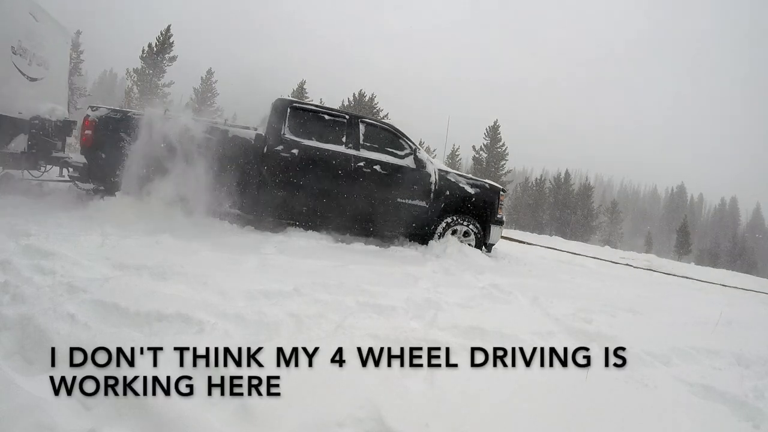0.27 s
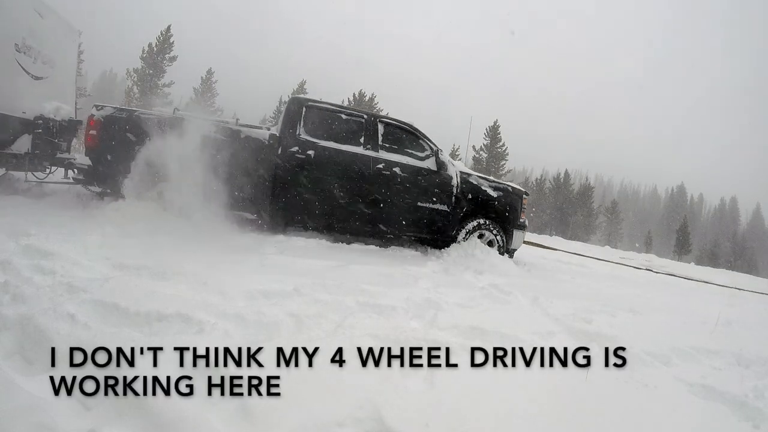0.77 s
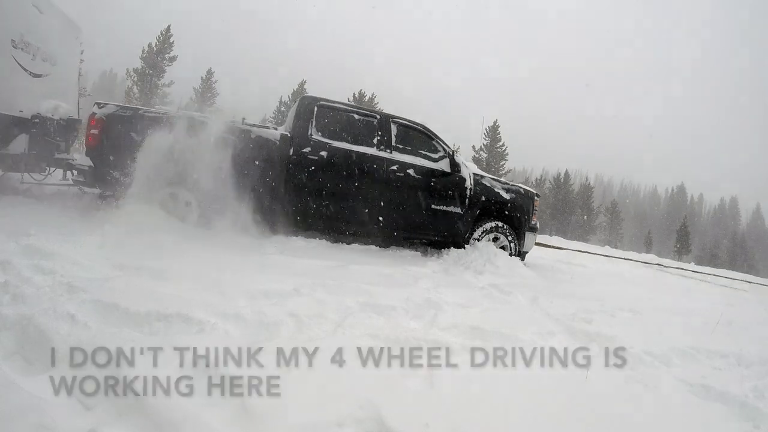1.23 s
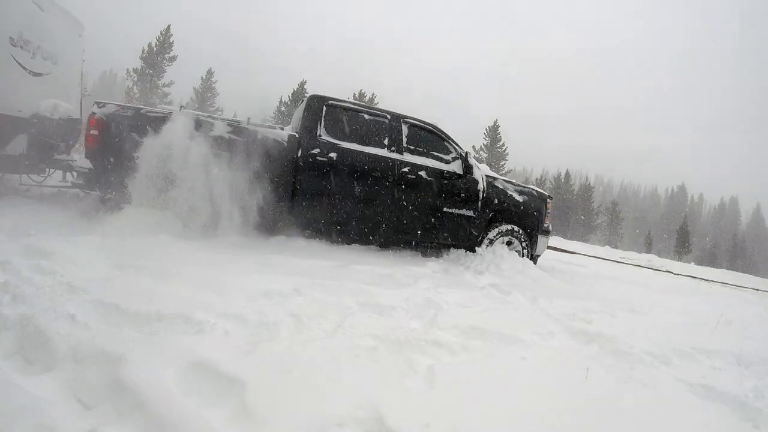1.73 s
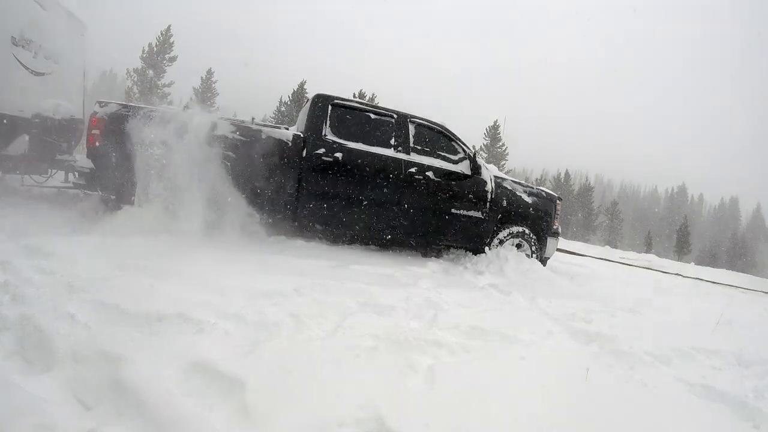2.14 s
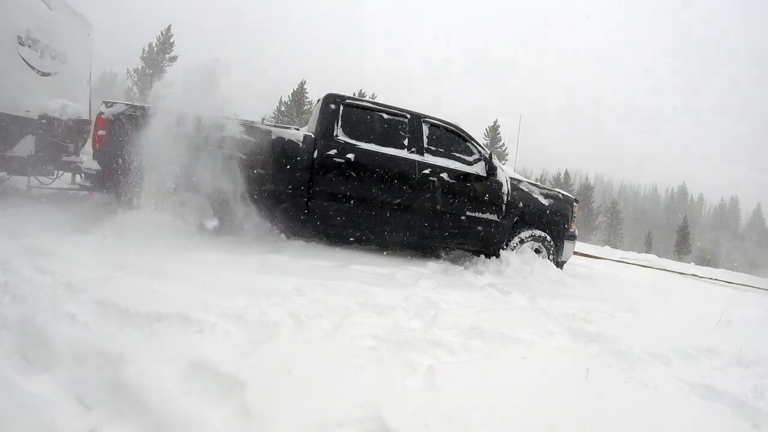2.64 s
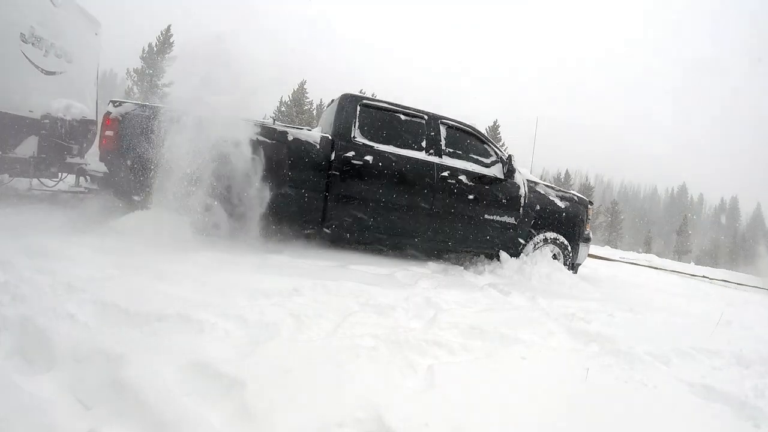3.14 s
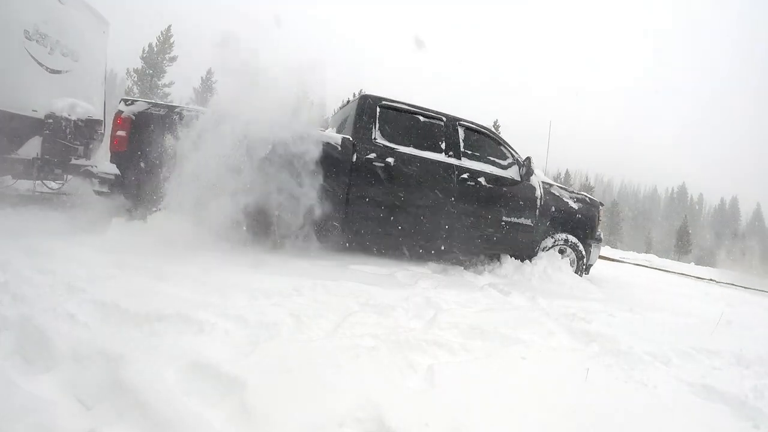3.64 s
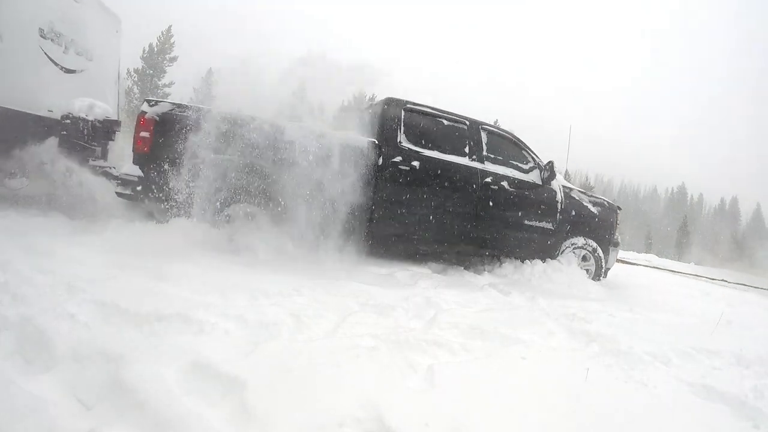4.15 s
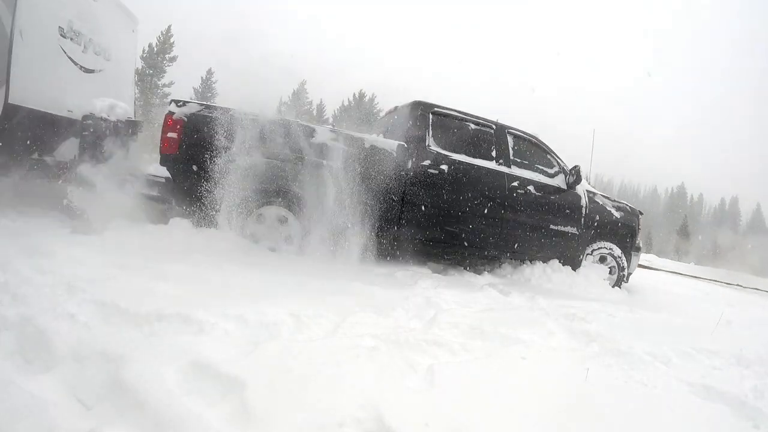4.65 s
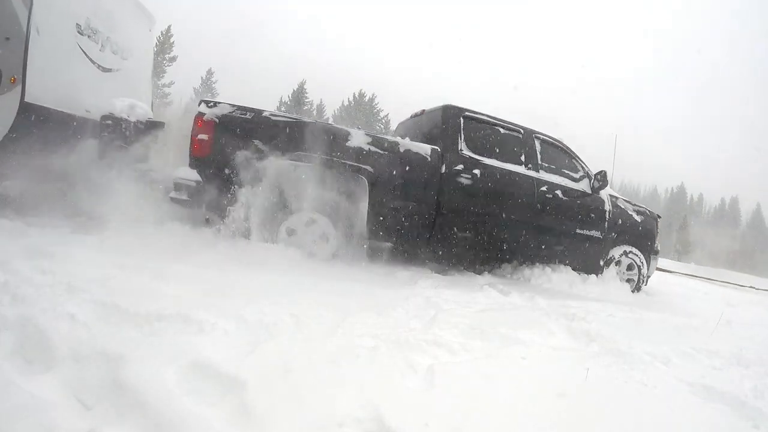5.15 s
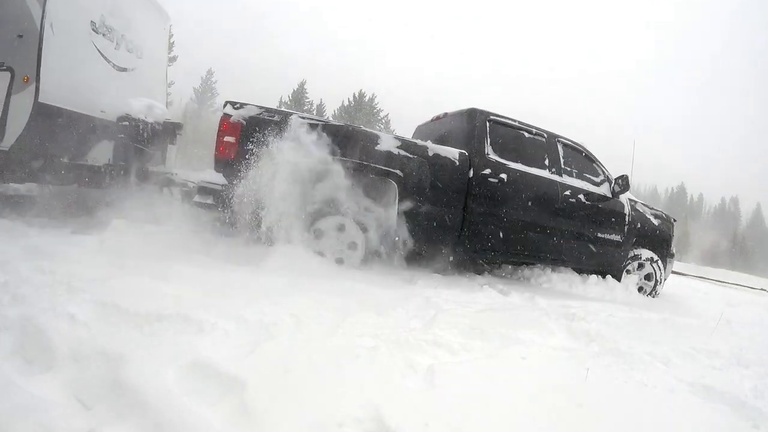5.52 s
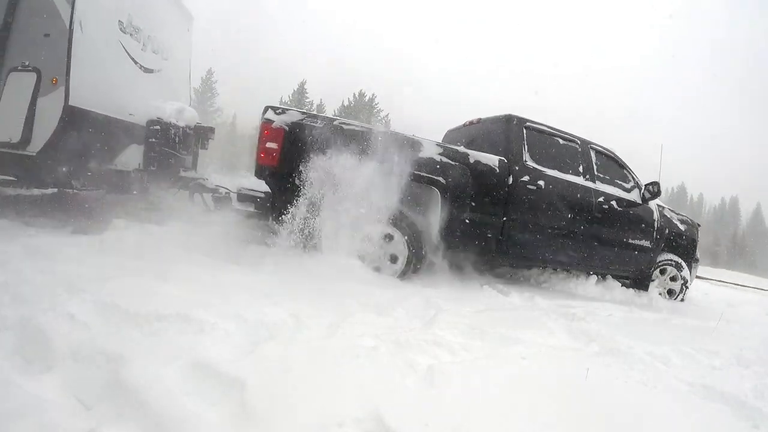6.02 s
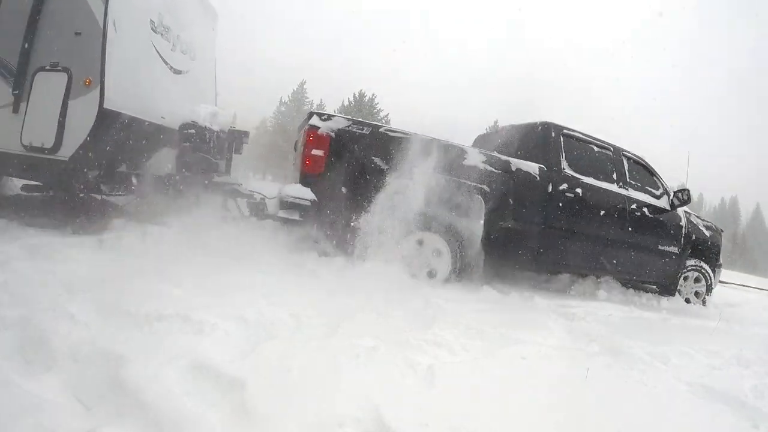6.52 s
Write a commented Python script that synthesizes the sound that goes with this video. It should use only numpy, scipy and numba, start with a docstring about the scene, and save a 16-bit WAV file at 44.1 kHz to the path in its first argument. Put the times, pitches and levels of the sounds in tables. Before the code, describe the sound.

Close outdoor phone pickup of a truck with spinning wheels in snow: a short loud rev sags, a longer one builds and holds, then the throttle lifts and the engine pulls on more quietly, slowly sinking. A deep wavering exhaust hum glides beneath. Snow spray hisses brightly during the revs and thins afterwards. Snowy ground reflects the sound slightly late, giving a hollow, combed colour without any roomy echo.

```python
"""Pickup engine in deep snow: revs hard, wheels spinning, lifts off, labours on more quietly.
Sines on multiples of the cycle rate make the engine tone; one order carries a whine.
A deep exhaust drone glides on its own pitch, with brief low hums beside it.
Shaped noise makes gas roar, churned and thrown snow, and the bass of body and wind.
The snow surface returns engine tone, gas and thrown snow a little late, which combs them."""
import sys
import numpy as np
from scipy import signal
from scipy.fft import rfft, irfft
from scipy.io import wavfile
from scipy.ndimage import uniform_filter1d, map_coordinates
from numba import njit

SR = 44100
rng = np.random.default_rng(int(sys.argv[2]) if len(sys.argv) > 2 else 0)


def decibels_to_gain(level_db):
    """Convert a level in decibels to a linear amplitude gain (20 dB per decade)."""
    exponent = np.asarray(level_db, float) / 20
    return 10 ** exponent


def waveform_to_disk(signal):
    """Save audio, clipped to [-1, 1], as 16-bit WAV at the path in sys.argv[1]."""
    frames = np.transpose(np.atleast_2d(signal))
    scaled = np.clip(frames, -1, 1) * 32767
    samples = np.round(scaled).astype(np.int16)
    wavfile.write(sys.argv[1], SR, samples)


N = 298557
T = np.arange(N) / SR  # s

# engine, a short rev, a long rev, then the quieter pull: t/s, cycle rate f/Hz, effort level/dB
ENGINE_CURVE = [(0.0, 39, 0), (0.146, 40.02, 1), (0.3, 40.95, 1), (0.55, 40.22, -1.5), (0.684, 38.71, -0.5),
                (0.802, 37.21, -1), (0.978, 32.43, -4.5), (1.158, 29.34, -4.5), (1.33, 28, -5),
                (1.62, 30.29, -2), (1.87, 32.22, -1), (2.17, 33.32, -1), (2.73, 34.44, -0.5),
                (3.01, 36.36, 0.5), (3.34, 37.4, 0), (3.75, 37.69, -0.5), (3.9, 37.17, -0.5),
                (4.13, 35.36, -2), (4.4, 31.48, -6), (4.55, 31.24, -10), (5.1, 30.02, -8.5),
                (5.55, 28.56, -7), (6.0, 27.87, -8), (6.5, 26.4, -10.5), (6.77, 26.4, -9)]
# outline of the engine orders at 0 dB effort: f/Hz, level/dB
ORDER_OUTLINE = [(30, -24.5), (100, -24.5), (160, -35), (300, -42.5), (480, -45.5), (750, -50.5),
                 (1000, -50.5), (1300, -41.5), (1700, -44.5), (2100, -56)]
# orders that stand out of the outline: multiple of the cycle rate, lift level/dB
STRONG_ORDERS = [(2, 2), (3, 5.5), (4, 1.5), (8, 6), (9, 3.5), (12, 7), (14, 3), (16, 6), (18, 12), (21, 0),
                 (29, 11.5), (32, 8.5), (36, 9), (38, 3.5), (40, 3), (43, 5), (46, 7.5)]
# exhaust and body resonances: centre f/Hz, width f/Hz, lift level/dB
PIPE_RESONANCES = [(78.2, 10, 4), (161, 24, 4), (302, 27, 6), (464, 49, 7.5), (650, 85, 7.5),
                   (1310, 180, 2.5), (1590, 20, 2)]
# whine on one engine order: t/s, level/dB
WHINE_CURVE = [(0, -28), (0.3, -25), (0.8, -32), (1.2, -31), (1.7, -33.5), (2.1, -33), (3.0, -36),
               (3.6, -33), (4.3, -38.5), (5.2, -40), (5.45, -31), (6.77, -31.5)]
# deep exhaust drone: t/s, pitch f/Hz, level/dB
DRONE_CURVE = [(0.0, 75.6, -7.5), (0.21, 78.6, -18.5), (0.4, 79.27, -9.5), (0.68, 80.1, -17),
               (0.81, 94.7, -16), (1.17, 111.8, -11.5), (1.6, 133.1, -23), (1.79, 129.3, -30),
               (2.06, 130.5, -18.5), (2.56, 129.8, -18), (2.88, 122.9, -15), (3.13, 113.7, -10),
               (3.71, 105.9, -18.5), (4.24, 101.3, -13.5), (4.4, 100.7, -24), (4.72, 98.5, -18),
               (4.92, 103.7, -11), (5.3, 111.1, -12), (6.32, 112.7, -14.5), (6.77, 120.4, -15)]
# partials of the drone: multiple of its pitch, level/dB
DRONE_PARTIALS = [(0.501, -21.5), (0.749, -18), (1, 0.5), (1.499, -26.5), (2, -28.5)]
# low hums: middle t/s, length t/s, start f/Hz, end f/Hz, level/dB
HUM_EVENTS = [(1.08, .4, 150.7, 144, -19), (1.999, 0.66, 189.5, 202.8, -27),
              (3.897, .5, 218.4, 207.1, -25.5), (4.95, 0.91, 171.5, 163, -22)]
# gas roar spectrum: f/Hz, relative level/dB per Hz
GAS_SPECTRUM = [(200, -6), (400, -12), (700, 5), (1300, 1), (2000, -2.5), (3000, -9), (5000, -34),
                (9000, -63)]
# low churning spectrum: f/Hz, relative level/dB per Hz
RUMBLE_SPECTRUM = [(100, -9.5), (170, -1), (230, -1.5), (300, 1), (400, -7.5), (550, -13), (900, -18),
                   (2000, -63)]
# low churning: t/s, level/dB
RUMBLE_CURVE = [(0, -20.5), (0.4, -30.5), (0.9, -31), (1.04, -20), (1.39, -30), (1.6, -26), (2.9, -23.5),
                (4.0, -19.5), (4.45, -18.5), (4.6, -23.5), (5.2, -22), (5.4, -25.5), (6.1, -24),
                (6.77, -26.5)]
# thrown snow spectrum: f/Hz, relative level/dB per Hz
SPRAY_SPECTRUM = [(1500, -14.5), (3000, -2), (4200, -2), (5600, -0.5), (6300, -25), (8200, -32),
                  (11600, -41)]
# thrown snow: t/s, level/dB
SPRAY_CURVE = [(0, -30), (0.24, -25), (0.41, -28), (0.8, -28.5), (0.95, -29), (1.39, -30), (1.64, -27.5),
               (2.2, -26.5), (2.8, -26.5), (3.3, -27), (3.9, -26.5), (4.24, -24), (4.53, -36.5),
               (4.95, -33.5), (5.4, -33), (6.15, -32.5), (6.6, -35.5), (6.77, -41.5)]
# finest powder spectrum: f/Hz, relative level/dB per Hz
POWDER_SPECTRUM = [(5500, -11), (6800, -1), (8300, -1), (10000, -6.5), (11600, -26), (15000, -28.5)]
# snow surge spectrum: f/Hz, relative level/dB per Hz
SURGE_SPECTRUM = [(2500, -24), (3600, -9), (4000, -1.5), (4700, 1), (5300, -9), (7000, -38)]
# bright surges of thrown snow: middle t/s, length t/s, level/dB
SURGE_EVENTS = [(0.2, 0.41, -30), (1.7, .5, -35), (2.8, .9, -29.5), (4.197, 0.41, -39.5)]
# reflection off the snow: t/s, first notch f/Hz, returned share 0-1
SNOW_BOUNCE = [(0, 1014, 0.24), (2.5, 1018, 0.46), (3.5, 995, 0.47), (4.2, 928.7, 0.51), (4.8, 862, 0.39),
               (5.6, 852, 0.49), (6.77, 842, 0.72)]
# bass spectrum: f/Hz, relative level/dB per Hz
BASS_SPECTRUM = [(10, -22), (20, -10), (33, 2), (50, -2.5), (80, -0.5), (120, -3), (160, -12), (250, -40),
                 (600, -63)]
# bass: t/s, level/dB
BASS_CURVE = [(0, -21.5), (1, -15), (2, -18.5), (4.5, -17), (5, -17.5), (6.4, -20.5), (6.77, -14)]

# dB gained per dB of effort
LOW_FOLLOW, MID_FOLLOW, HIGH_FOLLOW, GAS_FOLLOW = 0.24, 1.2, 2, 0.99
LOW_SPLIT_HZ, HIGH_SPLIT_HZ = 189.0, 950.0  # bounds of the middle orders
SING_DB_PER_HZ, SING_FROM_HZ = 1.07, 39  # middle orders sing clearer above this cycle rate
WHINE_ORDER = 11
GAS_DB = -24.5  # at 0 dB effort
POWDER_FOLLOW = 0.76  # dB of powder per dB of spray
GUST_DB, LULL_GUST_DB = 1.0, 2.5  # gust spread, normal and in thin spray
LULL_BELOW_DB = -30.5  # spray level midway between the two spreads
SNOW_DULL_HZ = 6840  # the snow swallows the treble of the late copy


def columns(table):
    """Each column of a curve table at every sample."""
    s, *cols = np.transpose(table)
    return [np.interp(T, s, c) for c in cols]


def walk(rate_hz):
    """Random levels held 1 / rate_hz s and slewed twice; spread near 1."""
    hold = int(SR / rate_hz)
    steps = np.repeat(rng.standard_normal(N // hold + 1), hold)
    return 1.16 * uniform_filter1d(uniform_filter1d(steps, hold), hold)[:N]


def swell(mid_s, length_s):
    """Share of the way through an event, and its smooth rise and fall."""
    u = np.clip((T - mid_s) / length_s + 0.5, 0, 1)
    return u, np.sin(np.pi * u)


def sine(phase, level_db):
    """Sine of the given rms level."""
    return np.sqrt(2) * decibels_to_gain(level_db) * np.sin(phase)


def colour(x, points, lo_hz, hi_hz):
    """Shape x by a spectrum table, with rms 1 between lo_hz and hi_hz."""
    hz, db = np.transpose(points)
    f = np.arange(N // 2 + 1) * SR / N + 1e-3
    spec = rfft(x) * decibels_to_gain(np.interp(np.log(f), np.log(hz), db))
    inside = np.sum(np.abs(spec[(f > lo_hz) & (f < hi_hz)]) ** 2)
    return irfft(spec, N) * N / np.sqrt(2 * inside)


@njit
def stack(phase, orders, start, gain, hop):
    """Sum of sines on multiples of the phase; gains are given every hop samples."""
    out = np.zeros(len(phase))
    for k in range(len(orders)):
        for i in range(len(phase)):
            j, a = i // hop, (i % hop) / hop
            level = gain[k, j] * (1 - a) + gain[k, j + 1] * a
            out[i] += level * np.sin(orders[k] * phase[i] + start[k])
    return out


def engine():
    """Engine tone with its whine, the cycle phase and the effort."""
    hz, effort_db = columns(ENGINE_CURVE)
    # the flywheel rounds off every change of speed
    hz = uniform_filter1d(hz, size=6000, mode="nearest")
    cycle = np.cumsum(hz) * 2 * np.pi / SR
    return engine_orders(hz, cycle, effort_db) + whine(cycle), cycle, effort_db


def engine_orders(hz, cycle, effort_db, waver_db=1.65, count=50, hop=512):
    """Multiples of the cycle rate: each wavers on its own and swells inside a pipe resonance."""
    mult = np.arange(1.0, count + 1)

    def per_hop(c):
        return np.append(c[::hop], c[-1])

    f = mult[:, None] * per_hop(hz)
    low = 1 / (1 + (f / LOW_SPLIT_HZ) ** 6)
    high = 1 / (1 + (HIGH_SPLIT_HZ / f) ** 6)
    mid = 1 - low - high
    outline_hz, outline_db = np.transpose(ORDER_OUTLINE)
    db = np.interp(np.log(f), np.log(outline_hz), outline_db)
    db = db + sum(lift_db * (mult[:, None] == round(k)) for k, lift_db in STRONG_ORDERS)
    db = db + (low * LOW_FOLLOW + mid * MID_FOLLOW + high * HIGH_FOLLOW) * per_hop(effort_db)
    db = db + mid * SING_DB_PER_HZ * np.maximum(per_hop(hz) - SING_FROM_HZ, 0)
    db = db + sum(d / (1 + (2 * (f - c) / w) ** 2) for c, w, d in PIPE_RESONANCES)
    wander = uniform_filter1d(rng.standard_normal(f.shape), size=28, axis=1) * np.sqrt(28)
    start = rng.uniform(0, 2 * np.pi, len(mult))
    return stack(cycle, mult, start, np.sqrt(2) * decibels_to_gain(db + waver_db * wander), hop)


def whine(cycle):
    """Sine locked to one engine order, its level independent of effort."""
    level_db, = columns(WHINE_CURVE)
    return sine(WHINE_ORDER * cycle, level_db + 1.3 * walk(7))


def drone():
    """Nearly pure deep note with faint partials; pitch and level waver."""
    hz, level_db = columns(DRONE_CURVE)
    phase = np.cumsum(hz * (1 + 0.0044 * walk(22))) * 2 * np.pi / SR
    level_db = level_db + 0.9 * walk(11)
    return sum(sine(m * phase, level_db + d + 0.5 * walk(10)) for m, d in DRONE_PARTIALS)


def hums():
    """Unsteady gliding low notes, each under one smooth swell."""
    out = 0
    for mid_s, length_s, start_hz, end_hz, level_db in HUM_EVENTS:
        u, shape = swell(mid_s, length_s)
        hz = (start_hz + (end_hz - start_hz) * u) * (1 + 0.012 * walk(25))
        phase = np.cumsum(hz) * 2 * np.pi / SR
        out = out + np.sqrt(shape) * sine(phase, level_db + 3.6 * walk(14))
    return out


def gas_roar(cycle, effort_db):
    """Exhaust gas noise, puffed once a cycle and louder with effort."""
    puffs = rng.standard_normal(N) * (1 + 0.099 * np.cos(cycle))
    level_db = GAS_DB + GAS_FOLLOW * effort_db + 1.1 * walk(8)
    return colour(puffs, GAS_SPECTRUM, 755, 2500) * decibels_to_gain(level_db)


def rumble():
    """Low churning: shaped noise of wavering level."""
    level_db, = columns(RUMBLE_CURVE)
    return colour(rng.standard_normal(N), RUMBLE_SPECTRUM, 110, 710) * decibels_to_gain(level_db + 2.25 * walk(12))


def thrown_snow():
    """Snow thrown by the tyres: noise in gusts and grains, with fine powder and bright surges."""
    spray_db, = columns(SPRAY_CURVE)
    thick = decibels_to_gain(4.6 * (spray_db - LULL_BELOW_DB))
    gust_db = (GUST_DB + (LULL_GUST_DB - GUST_DB) / (1 + thick)) * walk(6)
    grains = rng.standard_normal(N) * decibels_to_gain(0.69 * walk(400) + gust_db)
    spray = colour(grains, SPRAY_SPECTRUM, 3890, 9000) * decibels_to_gain(spray_db)
    # the finest powder adds quicker gusts of its own
    powder = rng.standard_normal(N) * decibels_to_gain(1.18 * gust_db + 2.07 * walk(10))
    powder = colour(powder, POWDER_SPECTRUM, 6850, 12000) * decibels_to_gain(POWDER_FOLLOW * spray_db - 17.5)
    surge_gain = sum(decibels_to_gain(db) * swell(mid_s, length_s)[1] for mid_s, length_s, db in SURGE_EVENTS)
    surges = colour(grains, SURGE_SPECTRUM, 3000, 6000) * surge_gain
    return spray + powder + surges


def off_snow(x):
    """Direct sound plus a late copy off the snow: notches at odd multiples of the first."""
    notch_hz, share = columns(SNOW_BOUNCE)
    # half a notch period late, less the delay of the dulling filter
    delay = SR / (2 * notch_hz) - SR / (2 * np.pi * SNOW_DULL_HZ)
    late = map_coordinates(x, [np.arange(N) - delay], order=3, mode="nearest")
    late = signal.sosfilt(signal.butter(1, SNOW_DULL_HZ, fs=SR, output="sos"), late)
    share = np.clip(share, 0, 0.95)
    return (x + share * late) / np.sqrt(1 + share ** 2)


def bass():
    """Deep shudder of the body and wind on the microphone, as one shaped noise."""
    level_db, = columns(BASS_CURVE)
    return colour(rng.standard_normal(N), BASS_SPECTRUM, 22, 150) * decibels_to_gain(level_db)


def scene():
    """Engine tone, gas and thrown snow also come off the snow; the low layers arrive once."""
    tone, cycle, effort_db = engine()
    combed = off_snow(tone + gas_roar(cycle, effort_db) + thrown_snow())
    return (combed + drone() + hums() + rumble() + bass())[None]


def band_limit(x):
    """A steep low-pass at the top of the band."""
    return signal.sosfilt(signal.butter(12, 15200, fs=SR, output="sos"), x)


def record(dry):
    """The phone rounds off the loudest peaks."""
    mix = np.tanh(0.84 * dry) / 0.96
    return band_limit(mix)


dry = scene()
out = record(dry)
waveform_to_disk(out)
```